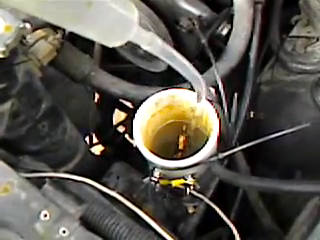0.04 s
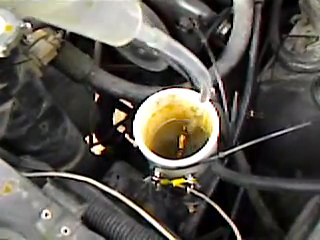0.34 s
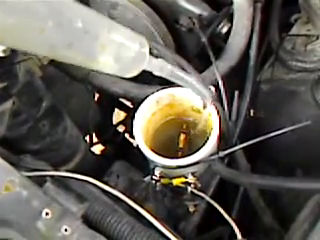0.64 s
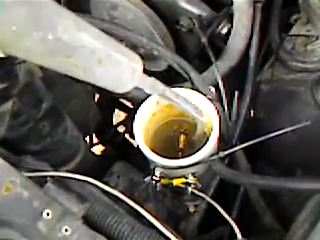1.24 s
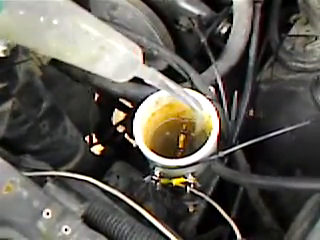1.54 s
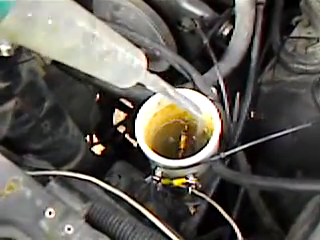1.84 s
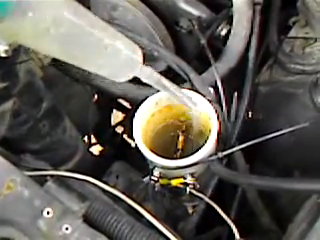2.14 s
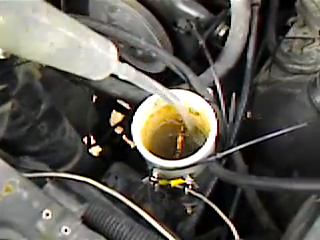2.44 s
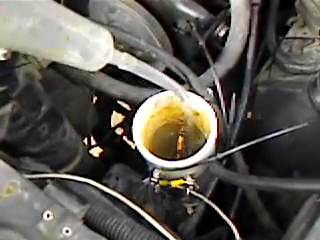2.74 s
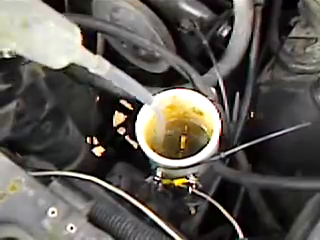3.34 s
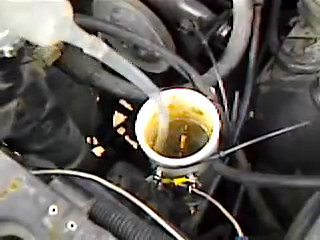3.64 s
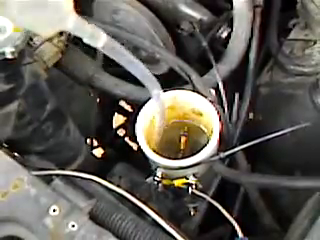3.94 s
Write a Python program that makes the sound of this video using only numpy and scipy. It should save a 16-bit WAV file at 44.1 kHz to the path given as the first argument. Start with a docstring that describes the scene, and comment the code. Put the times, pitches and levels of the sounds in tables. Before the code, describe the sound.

A plastic syringe draws fluid through a soft hose, its plunger creaking twice, each time followed by wet slurps and hollow bumps. Outdoors, wind on the dull microphone fades to hiss. Finally, plastic clatters loudly up close.

```python
"""Outdoors at an engine bay, where a big plastic syringe draws fluid from a reservoir through a soft hose.
The plunger sticks and slips, ringing the barrel; the hose slurps air and fluid and bumps the rim.
Wind buffets the microphone and dies away, leaving hiss and a faint whine. Near the end something
plastic clatters close to the microphone and overloads the small, dull recorder."""
import sys
import numpy as np
from scipy import signal
from scipy.fft import rfft, irfft
from scipy.io import wavfile
from scipy.ndimage import uniform_filter1d

SR = 44100
rng = np.random.default_rng(int(sys.argv[2]) if len(sys.argv) > 2 else 0)


def master_out(mix):
    """Clip the mix to full scale and print it as 16-bit PCM to the path in sys.argv[1]."""
    frames = np.transpose(np.atleast_2d(mix))
    ceiling = np.clip(frames, -1, 1)
    pcm = np.round(ceiling * 32767).astype(np.int16)
    wavfile.write(sys.argv[1], SR, pcm)


N = 176400
T = np.arange(N) / SR


def plunger(pull_starts_s=(.816, 2.903), pull_s=.1, pitch_fall=.03):
    """The plunger sticks and slips; each slip snaps, crackles and rings the plastic barrel."""
    # Each row: start of a slip in seconds, level in dB, extra dB for the two lowest modes.
    slips = [(.816, -27, 0), (.825, -19.5, 1.5), (.832, -15.5, -7.5), (.842, -16, -0.5), (.851, -13, -17),
             (.863, -13.5, -7), (.8865, -14, -12.5), (.902, -18.5, -2.5), (.912, -23.5, -2.5),
             (.917, -19.5, 4), (.941, -24, 7), (2.903, -22, -40), (2.914, -20.5, -8), (2.923, -18, 0.5),
             (2.931, -22.5, 7.5), (2.941, -23.5, 5.5), (2.951, -28, -3), (2.959, -25.5, 9.5),
             (2.977, -25, -1), (3.026, -32.5, 5.5), (3.133, -26.5, 10), (3.141, -29.5, -1.5)]
    # Each row: a barrel mode in Hz, level in dB, ring time (T60) in seconds.
    barrel_modes = [(1077, -5.5, 0.073), (1200, -16, 0.015), (1675, -7, 0.011), (2128, -5.5, 0.044),
                    (2172, -12.5, 0.049), (2660, -14, .025), (3710, -17.5, 0.029)]
    # The crack of a slip. Each row: frequency in Hz, spectral level in dB.
    crack_spectrum = [(150, -17), (380, 9), (700, -16), (1200, 8.5), (1700, -2), (2700, -7.5), (3900, -5.5)]
    ring, crackle, snaps = np.zeros((3, N))
    chance = rng.standard_normal((len(slips), len(barrel_modes), 2))
    for (start, db, low_db), luck in zip(slips, chance):
        crackle += struck(start, db - 10, t60=.022)
        snaps += snap(start, db - 6.5)
        travel = min(1, min(abs(start - pull) for pull in pull_starts_s) / pull_s)
        sag = pitch_fall * (travel - .5)  # the pitch sinks through each pull
        for (hz, mode_db, t60), (stray_db, detune) in zip(barrel_modes, luck):
            ring_db = db + mode_db + low_db * (hz < barrel_modes[2][0]) + stray_db
            ring += struck(start, ring_db, t60, hz * (1 - sag + .016 * detune))
    return ring + coloured(snaps + crackle * rng.standard_normal(N), crack_spectrum)


def hose_slurps(attack_s=.009, release_s=.01, grains_per_s=2200, spread_db=5.5):
    """Air breaks through the fluid in short runs of dense crackle, with lone wet ticks between."""
    # Each row: start of a slurp in seconds, length in seconds, level in dB.
    slurps = [(0.03, .03, -46), (0.185, 0.023, -41), (0.814, 0.11, -42), (1.079, 0.054, -31),
              (1.131, 0.039, -38), (1.177, 0.023, -43.5), (1.219, 0.025, -31.5), (1.242, 0.031, -34),
              (1.28, 0.012, -35), (1.429, 0.0083, -37), (1.463, 0.19, -49.5), (2.894, 0.12, -38.5),
              (3.129, 0.011, -36), (3.183, 0.029, -31), (3.295, 0.018, -34.5), (3.535, 0.048, -43.5)]
    # Each row: start of a wet tick in seconds, relative level in dB.
    ticks = [(0.059, -17.5), (1.094, -11.5), (1.1254, -18.5), (1.236, -25), (1.254, -12.5), (1.268, -25),
             (1.2858, -23), (1.336, -24.5), (1.434, -23), (1.556, -26), (1.646, -20), (1.6805, -26),
             (1.824, -23.5), (2.2121, -27), (2.571, -25), (2.7176, -30.5), (3.057, -19), (3.194, -20),
             (3.232, -20.5), (3.2845, -20.5), (3.4564, -25.5), (3.5185, -21.5), (3.54, -25.5), (3.57, -29),
             (3.619, -23)]
    # The fizz in the hose. Each row: frequency in Hz, spectral level in dB.
    fizz_spectrum = [(150, -1.5), (400, 2), (1000, 3), (1600, 2.5), (2400, 2), (3400, 2.5), (4200, -2.5)]
    flow = np.zeros(N)
    for start, length, db in slurps:
        rise = np.clip((T - start) / attack_s, 0, 1)
        fall = np.exp(-np.maximum(T - start - length, 0) / release_s)
        flow += from_db(db) * rise * fall
    sizes = from_db(spread_db * np.minimum(rng.exponential(1, N), 4)) * rng.choice([-1, 1], N)
    grains = rms_one(sizes * (rng.random(N) < grains_per_s / SR))
    snaps = sum(snap(start, db + 3) for start, db in ticks)
    tails = sum(struck(start, db - 7, t60=.015) for start, db in ticks)
    return coloured(flow * grains + snaps + tails * rng.standard_normal(N), fizz_spectrum)


def hose_bumps(attack_s=.0014):
    """The soft hose gulps and bumps the rim: hollow notes that fall fast at first, then ring out."""
    # Each row: start in seconds, level in dB, pitch in Hz, ring time (T60) in seconds.
    bumps = [(0.087, -11.5, 1430, 0.0079), (.406, -10.5, 628, 0.013), (.6965, -12.5, 788, 0.016),
             (0.723, -23.5, 1246, .025), (1.082, -16, 1080, .03), (1.1, -15.5, 686, 0.078),
             (1.1036, -11, 1106, 0.038), (1.113, -11, 970, 0.012), (1.114, -21, 2390, 0.063),
             (1.192, -22.5, 1074, .025), (1.197, -16, 374, 0.025), (1.645, -26, 1320, .025),
             (2.923, -31.5, 409, 0.24), (2.952, -19.5, 313, 0.056), (2.992, -26.5, 641, 0.13),
             (3.057, -22.5, 335, 0.096), (3.067, -22.5, 261.7, 0.17), (3.121, -23.5, 1267, 0.033),
             (3.134, -21, 946, 0.029)]
    out = np.zeros(N)
    for start, db, hz, t60 in bumps:
        out += struck(start, db, t60, hz, attack_s)
        out += struck(start, db - 10.5, .41 * t60, hz, attack_s)
    return out


def plastic_clatter(attack_s=.0017, scatter_db=3.5, hard_contact_db=-20):
    """Close knocks on plastic ring the contact, the shell and the air inside, and rattle briefly."""
    # Each row: start in seconds, relative level in dB, contact pitch in Hz,
    # then the rattle and the hollow ring in dB against that level.
    knocks = [(3.515, -33, 990, 2, -12), (3.568, -33.5, 1000, 5.5, -9.5), (3.6523, -9.5, 940, -35.5, -9.5),
              (3.668, -11, 1042, -3.5, -17), (3.672, 2, 791, -14.5, -11.5), (3.684, 1.5, 963, -16, -18.5),
              (3.692, -1, 970, -10, -16), (3.6984, -15.5, 2800, -4.5, -32), (3.7092, -1.5, 1008, -6, -26),
              (3.7138, -4, 1452, -3, -29), (3.727, -10, 1220, -5.5, -24), (3.746, -5.5, 1107, -7, -27.5),
              (3.748, -0.5, 968, -38.5, -24), (3.761, -7, 1062, -11, -27), (3.793, -26.5, 877, -3.5, 4.5),
              (3.945, -19, 966, -13.5, -1.5)]
    # Each row: a shell mode in Hz, level in dB, ring time (T60) in seconds.
    shell_modes = [(394, -20, .04), (734, -17.5, 0.06), (857, -17.5, 0.071), (1154, -18.5, .05),
                   (1620, -20, 0.037), (1887, -20.5, 0.056), (2320, -23.5, .04), (2757, -24.5, 0.12),
                   (2840, -28, .04), (3290, -31, 0.038)]
    # The rattle. Each row: frequency in Hz, spectral level in dB.
    rattle_spectrum = [(200, -22), (450, -7), (1000, 6), (1800, -3), (2900, -5.5), (4000, -11)]
    # A barely audible sub-bass swell from the recorder's offset shifting under the knocks.
    # Each row: frequency in Hz, spectral level in dB.
    offset_swell_spectrum = [(20, 12.5), (45, -16), (80, -16.5), (200, -18.5), (500, -37)]
    ring, rattle, offset_swell = np.zeros((3, N))
    chance = rng.standard_normal((len(knocks), len(shell_modes)))
    for (start, db, hz, rattle_db, hollow_db), luck in zip(knocks, chance):
        ring += struck(start, db + 3, t60=.035, hz=hz, attack_s=attack_s)
        ring += struck(start, db + hollow_db, t60=.095, hz=336, attack_s=attack_s)  # the air inside
        rattle += struck(start, db + rattle_db, t60=.045)
        offset_swell += struck(start, db - 26.5, t60=.3, attack_s=attack_s)
        # Knocks that rattle less also stir the high modes less.
        softness_db = .48 * min(rattle_db - hard_contact_db, 0)
        for k, (mode_hz, mode_db, t60) in enumerate(shell_modes):
            ring_db = db + mode_db + softness_db * (mode_hz > hz) + scatter_db * luck[k]
            ring += (-1) ** k * struck(start, ring_db, t60, mode_hz)
    offset_swell *= coloured(rng.standard_normal(N), offset_swell_spectrum)
    return ring + offset_swell + coloured(rattle * rng.standard_normal(N), rattle_spectrum)


def gust_db(puff_width_s=.0091):
    """The wind's strength in dB: one dying gust and a few last puffs."""
    # The gust, then the puffs. Each row: time in seconds, level in dB.
    gust_curve = [(0, -19.5), (.04, -16), (.095, -12), (.135, -22), (.19, -15.5), (.28, -19), (.34, -16),
                  (.39, -20.5), (.49, -17.5), (.55, -24.5), (.58, -16.5), (.605, -25.5), (.635, -12.5),
                  (.71, -17.5), (.79, -13), (.9, -21.5), (.99, -22), (1.04, -21.5), (1.08, -26.5),
                  (1.2, -28), (1.3, -29.5), (1.37, -25.5), (1.5, -39.5), (1.9, -41.5), (2.1, -43.5),
                  (2.6, -47), (4, -59)]
    puff_peaks = [(1.365, -40), (1.579, -41), (1.65, -35), (1.86, -39), (1.935, -40), (2.354, -36)]
    gust = from_db(np.interp(T, *np.transpose(gust_curve)))
    puffs = sum(from_db(db) * np.exp(-.5 * ((T - peak) / puff_width_s) ** 2) for peak, db in puff_peaks)
    return 20 * np.log10(gust + puffs)


def wind(flutter_db=2.0, full_gust_db=-16.5, knee_hz=130, dulling=.34):
    """Lumpy turbulence on the microphone; its upper bands sink faster as the gust dies."""
    # Wind at full strength. Each row: frequency in Hz, spectral level in dB.
    wind_spectrum = [(20, -7.5), (50, 1), (90, 0.5), (165, -1), (330, -12), (550, -22), (1000, -36.5),
                     (2000, -56.5), (4000, -48.5)]
    strength_db = gust_db()
    edges_hz = 20 * 2 ** np.arange(0, 8, .5)  # half octaves
    white = rng.standard_normal((2, N))
    lumps = drift(27)
    full, dulled = np.zeros((2, N))
    for k, (low, high) in enumerate(zip(edges_hz, edges_hz[1:])):
        hz = np.sqrt(low * high)
        octaves = max(0, np.log2(hz / knee_hz))
        bandpass = signal.butter(2, [low, high], "band", fs=SR, output="sos")
        band = from_db(at_hz(wind_spectrum, hz)) * signal.sosfilt(bandpass, white[k % 2])
        band *= from_db(flutter_db * min(octaves, 2) * lumps)
        full += band
        dulled += band * from_db(dulling * octaves * (strength_db - full_gust_db))
    # The gust, not chance, sets the level over spans longer than 46 ms.
    running_rms = np.sqrt(uniform_filter1d(full ** 2, size=int(.046 * SR)) + 1e-12)
    return from_db(strength_db - 1.5) * dulled / running_rms


def hiss_and_whine(hiss_db=-40.5, waver_db=2.9):
    """Even hiss lies behind everything, with two thin, wavering tones."""
    # Each row: pitch of a whine in Hz, RMS level in dB.
    tones = [(398.4, -54), (1035, -53)]
    # The hiss. Each row: frequency in Hz, spectral level in dB.
    hiss_spectrum = [(20, -11.5), (45, -5), (85, 0), (170, -6), (290, -5), (420, -5.5), (600, -9.5),
                     (1000, -14), (2000, -19.5), (3600, -22), (4100, -25)]
    whine = np.zeros(N)
    for hz, db in tones:
        amplitude = np.sqrt(2) * from_db(db + waver_db * drift(1.7))
        whine += amplitude * np.sin(2 * np.pi * hz * T + .13 * drift(3))
    return from_db(hiss_db) * coloured(rng.standard_normal(N), hiss_spectrum) + whine


def engine_bay(x, echo_db=-13.5, delay_s=.0017):
    """Close metal and plastic surfaces add a short scatter of echoes."""
    tail = (struck(delay_s, 0, t60=.11) * rng.standard_normal(N))[:SR // 4]
    tail /= np.sqrt(np.sum(tail ** 2))
    return x + from_db(echo_db) * signal.fftconvolve(x, tail)[:N]


def struck(start_s, db, t60, hz=None, attack_s=1e-5):
    """An envelope that dies by 60 dB in t60 seconds, or a dying sine if it has a pitch."""
    out, first = np.zeros(N), int(start_s * SR)
    age = T[:min(N - first, int(2 * t60 * SR))]
    shape = from_db(db - 60 * age / t60) * (1 - np.exp(-age / attack_s))
    out[first:first + len(age)] = shape if hz is None else shape * np.sin(2 * np.pi * hz * age)
    return out


def snap(start_s, db):
    """A single sharp click."""
    out = np.zeros(N)
    out[int(start_s * SR)] = from_db(db)
    return out


def drift(rate_hz):
    """A slow random wander of unit power."""
    hop, settle = 40, 2000
    pole = np.exp(-2 * np.pi * rate_hz * hop / SR)
    white = rng.standard_normal(N // hop + settle + 2)
    slow = signal.lfilter([1], [1, -2 * pole, pole * pole], white)[settle:]
    return np.interp(np.arange(N) / hop, np.arange(len(slow)), rms_one(slow))


def coloured(x, spectrum):
    """Give x a spectrum, rolled off above 5 kHz; white noise keeps its power."""
    hz = np.arange(N // 2 + 1) * SR / N
    gain = from_db(at_hz(spectrum, hz)) / (1 + (hz / 5000) ** 12)
    return irfft(rfft(x) * rms_one(gain), N)


def at_hz(spectrum, hz):
    """Read a spectrum in dB on a log-frequency axis."""
    points_hz, db = np.transpose(spectrum)
    return np.interp(np.log(np.maximum(hz, 1)), np.log(points_hz), db)


def from_db(db):
    """Decibels to gain."""
    return 10 ** (np.asarray(db) / 20)


def rms_one(x):
    """Scale to unit power."""
    return x / np.sqrt(np.mean(x ** 2) + 1e-20)


def scene():
    """One microphone in the wind: the syringe echoes in the bay, the clatter is close and dry."""
    outdoors = wind() + hiss_and_whine()
    syringe = engine_bay(plunger() + hose_slurps() + hose_bumps())
    return (outdoors + syringe + from_db(1.5) * plastic_clatter())[None]


def record(dry, threshold_db=-15, duck_share=.44, recover_db_per_s=14, ceiling=.71, cutoff_hz=4100):
    """The small recorder ducks after loud sound, loses the treble and overloads on the hardest knocks."""
    power = uniform_filter1d(dry[0] ** 2, size=441)
    level_db = 10 * np.log10(np.maximum(power, 1e-12))
    wanted_db = duck_share * np.maximum(level_db - threshold_db, 0)
    held_db = np.maximum.accumulate(wanted_db + recover_db_per_s * T) - recover_db_per_s * T
    pole = np.exp(-1 / (.015 * SR))  # the gain control takes 15 ms to act
    duck_db = signal.lfilter([1 - pole], [1, -pole], held_db)
    driven = dry * from_db(-duck_db) / ceiling
    rounded = ceiling * driven / (1 + driven ** 6) ** (1 / 6)
    dull = signal.sosfiltfilt(signal.butter(14, cutoff_hz, fs=SR, output="sos"), rounded)
    clipped = np.clip(dull, -.69, .69)
    return signal.sosfilt(signal.butter(12, 16000, fs=SR, output="sos"), clipped)


dry = scene()
out = record(dry)
master_out(out)
```